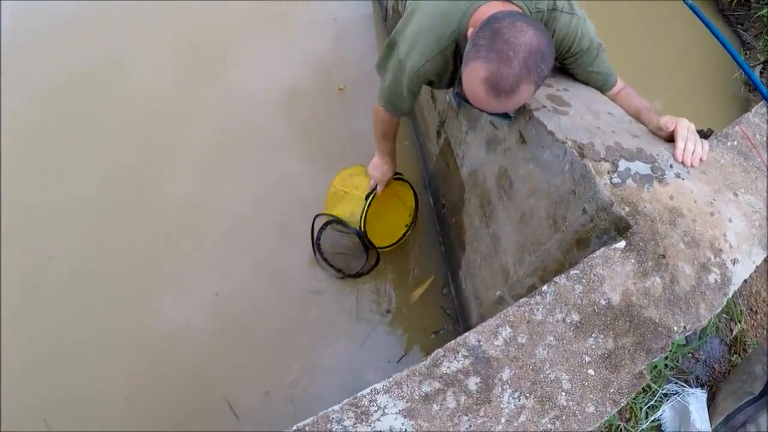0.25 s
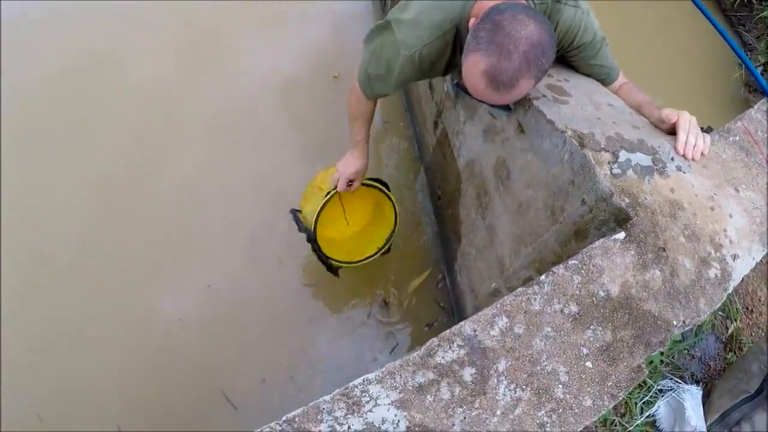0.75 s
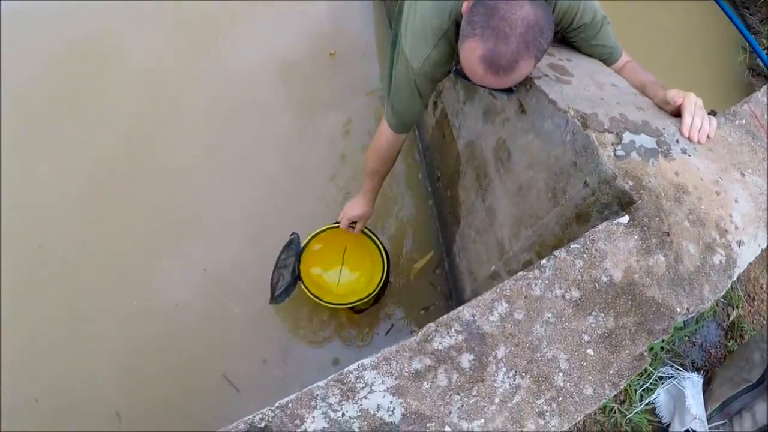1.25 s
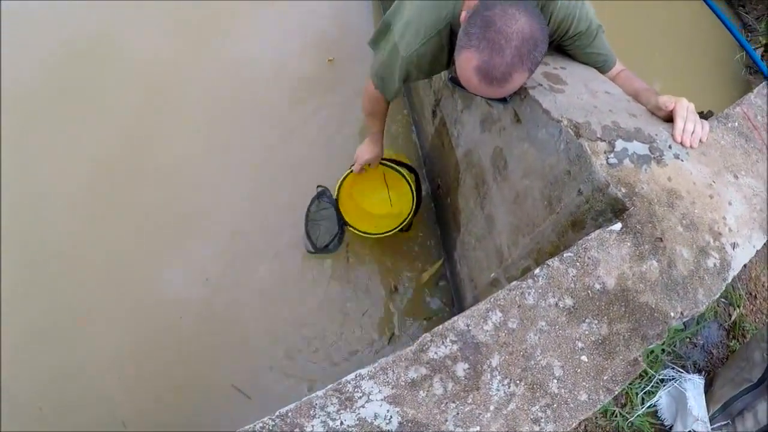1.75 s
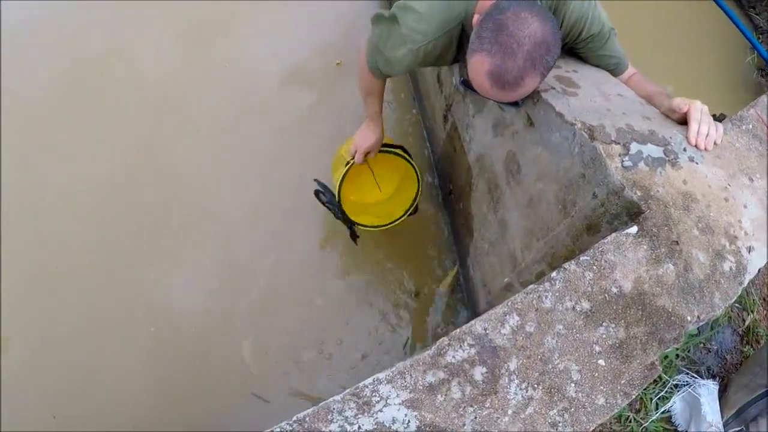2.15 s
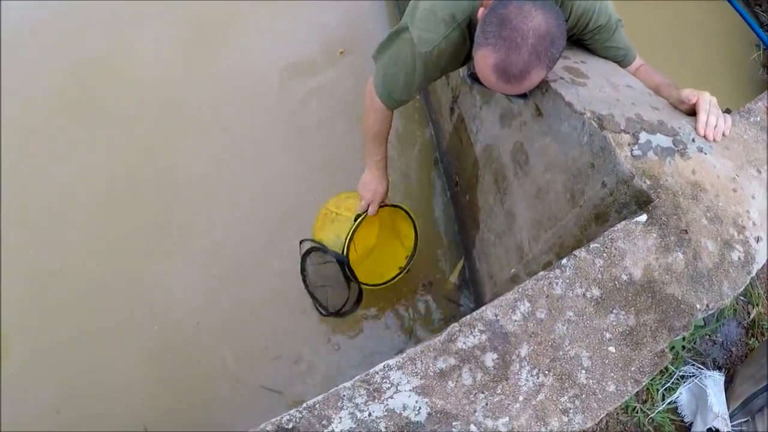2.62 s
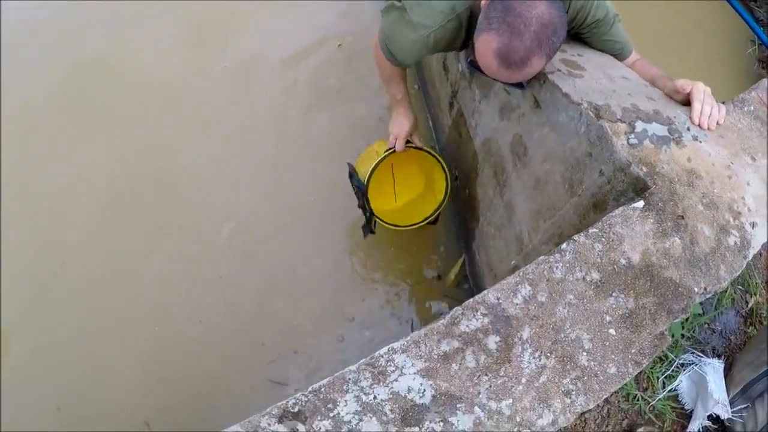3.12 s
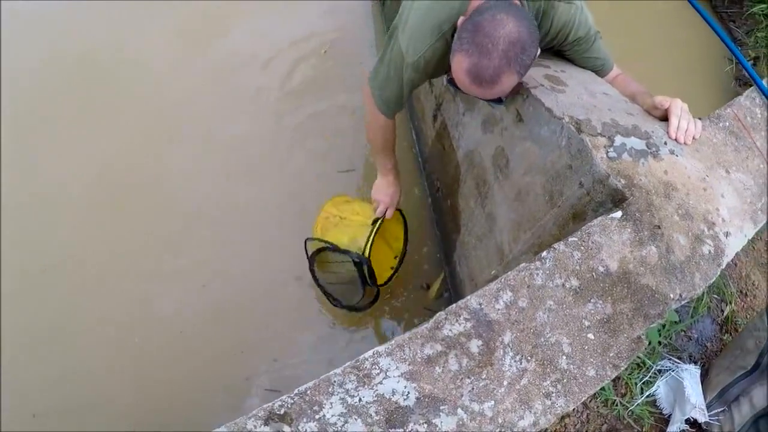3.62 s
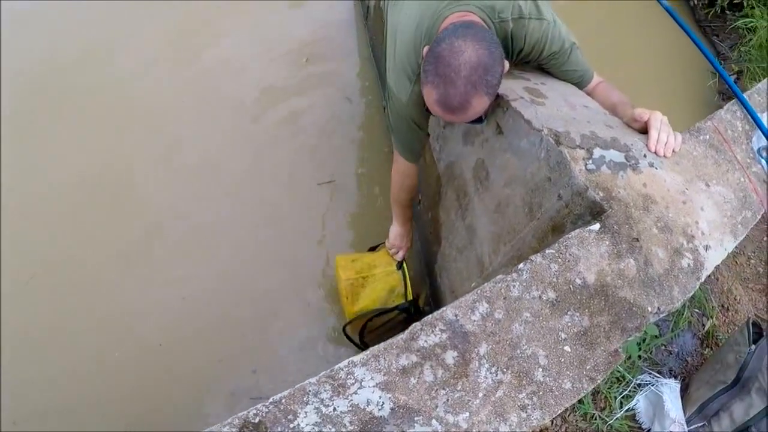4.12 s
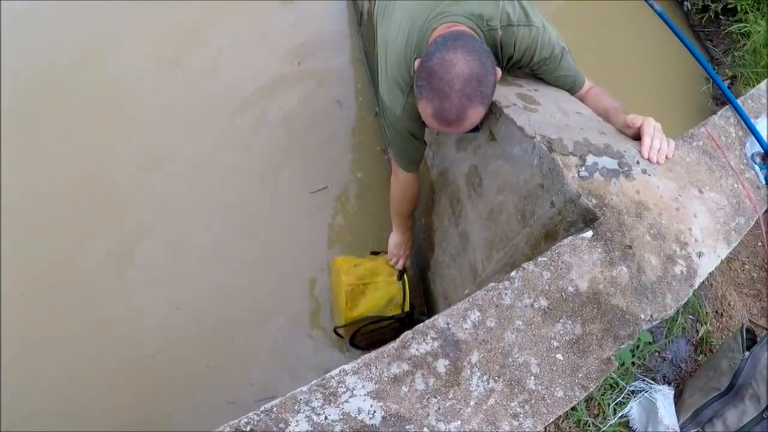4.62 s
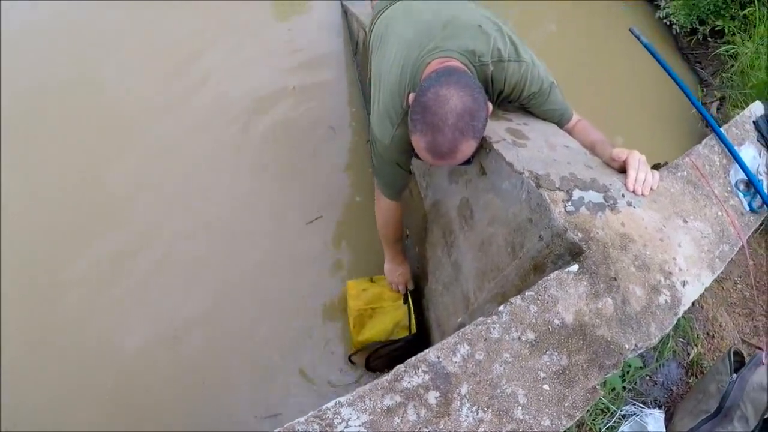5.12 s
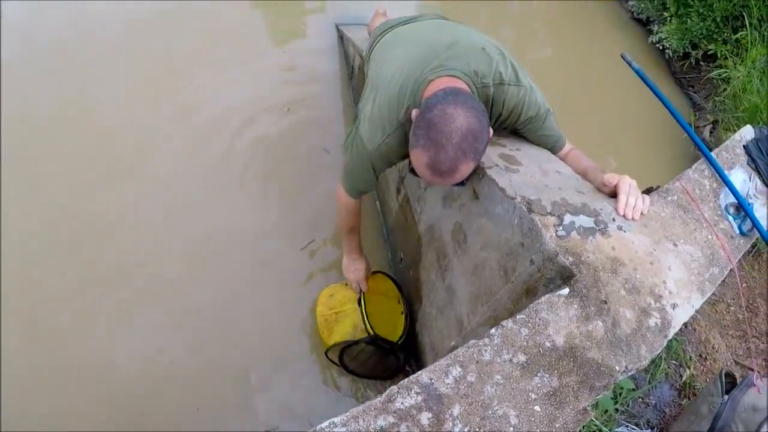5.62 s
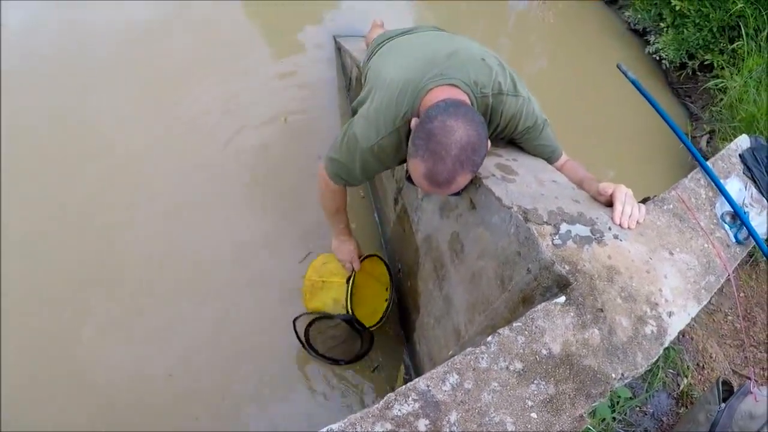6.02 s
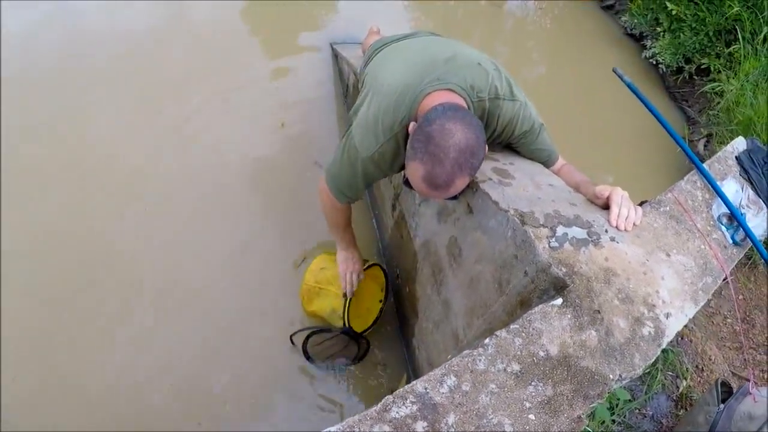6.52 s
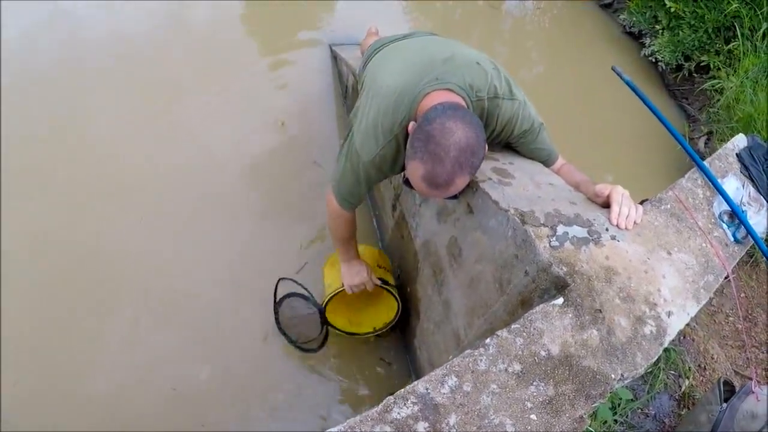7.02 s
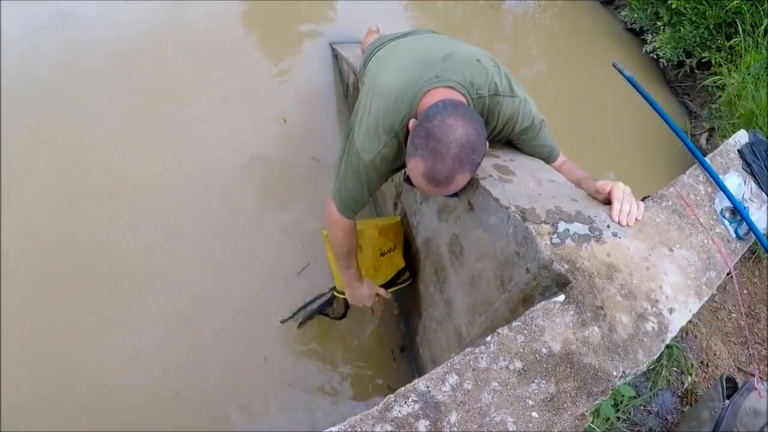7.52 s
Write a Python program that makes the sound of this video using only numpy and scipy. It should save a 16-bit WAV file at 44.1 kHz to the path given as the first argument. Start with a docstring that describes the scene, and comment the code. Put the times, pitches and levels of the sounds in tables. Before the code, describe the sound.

Outdoors beside a concrete wall, a distant idling engine hums low and steady with a slight flutter, under soft air noise. From 0.4 s a soft bucket sends small trickles into the river; at 0.75 s a bright plop, splash and dull knock coincide. Spurts of dripping, plinks and crackling splashes continue to about 2.3 s, with a low throb on the left near 1.8 s. It then calms, with only faint swirls and droplets, until plops, splashes and a knock around 4.2-4.5 s. A stronger hollow knock lands at 5.0 s, another at 5.3 s with gurgles, then scattered drops and a knock at 6.2 s. Short slops begin at 7.3 s and 7.45 s; a fuller gush follows at 7.6 s with a sharp click, ending in plinks. Faint sparrow-like chirps, mostly before 2.5 s, and occasional thin whistles sound far off. Short echoes surround the close water.

```python
"""A soft plastic bucket is swished through river water by a concrete wall, lifted dripping, dipped and tipped.
Noise spray and clouds of decaying, rising sines make the streams; single rising sines plop and slide upward.
Noise bursts splash, struck modes knock hollowly, and shaped noise swirls; a short low throb is heard once.
Behind, gliding sines chirp and close engine lines beat over a noise drone and air noise.
The wall adds short scattered echoes; the recorder spreads the stereo phase and cuts the deep bass and the top."""
import sys
import numpy as np
from scipy import signal
from scipy.fft import rfft, irfft, next_fast_len
from scipy.io import wavfile
from scipy.ndimage import uniform_filter1d, map_coordinates

SR = 44100
rng = np.random.default_rng(int(sys.argv[2]) if len(sys.argv) > 2 else 0)


def persist_wave(psi):
    """Save psi, clipped to +-1, as 16-bit WAV."""
    counts = np.round(np.clip(psi, -1, 1) * 32767).astype(np.int16)
    wavfile.write(sys.argv[1], SR, np.atleast_2d(counts).T)


N = 342216


def amp(db):
    """Decibels to gain."""
    return 10 ** (np.asarray(db) / 20)


def unit(x):
    """Scale to rms 1."""
    return x / np.sqrt(np.mean(x ** 2) + 1e-20)


def along(points, hz):
    """Interpolate (Hz, value) points on a log frequency axis."""
    f, v = np.transpose(points)
    return np.interp(np.log(hz + 1), np.log(f + 1), v)


def wobble(knots_per_s, size=N):
    """Smooth random curve."""
    knots = rng.standard_normal(int(size * knots_per_s / SR) + 4)
    return map_coordinates(knots, [np.arange(size) * knots_per_s / SR])


def filtered(x, response):
    """Multiply the spectrum of x by a response of frequency."""
    n = x.shape[-1]
    padded = next_fast_len(n + SR // 4)
    hz = np.fft.rfftfreq(padded, 1 / SR)
    return irfft(rfft(x, padded) * response(hz), padded)[..., :n]


def shaped(x, points):
    """Filter by a (Hz, dB) curve."""
    return filtered(x, lambda hz: amp(along(points, hz)))


def add(track, start_s, sound):
    """Mix a sound into a track, trimming what falls outside."""
    i = round(start_s * SR)
    part = sound[max(-i, 0):max(N - i, 0)]
    track[max(i, 0):max(i, 0) + len(part)] += part


def event_track():
    """Empty track and the time axis of one short event [s]."""
    return np.zeros(N), np.arange(SR // 6) / SR


def bubble(t, hz, t60_s, rise):
    """An air pocket starts softly and rings, rising in pitch as it nears the surface."""
    onset = 1 - np.exp(-.8 * t * hz)
    phase = 2 * np.pi * hz * t * (1 + rise * t / t60_s / 2)
    return amp(-60 * t / t60_s) * onset * np.sin(phase)


def fizz(count, centre_hz, spread, cycles, size_db):
    """A cloud of random bubbles of rms 1; small ones die sooner."""
    t = np.arange(int(SR * cycles / centre_hz)) / SR
    start, size = rng.random((2, count, 1))
    hz = np.clip(centre_hz * np.exp(spread * rng.standard_normal((count, 1))), 300, 9000)
    gain = amp(size_db * np.minimum(-np.log(size), 3))
    rings = gain * bubble(t, hz, cycles / hz, rise=0.25)
    index = (start * N).astype(int) + np.arange(len(t))
    return unit(np.bincount(index.ravel(), rings.ravel(), N)[:N])


def spatter(rough_db=2.5):
    """The finest droplets: dense, rough noise without ringing."""
    return unit(rng.standard_normal(N) * amp(rough_db * wobble(500)))


def flow(start_s, length_s, rise_s, fall_db_per_s):
    """A flow of water builds up, holds for its length and dies away."""
    t = np.maximum(np.arange(N) / SR - start_s, 0)
    return (1 - np.exp(-t / rise_s)) * amp(-fall_db_per_s * np.maximum(t - length_s, 0))


# streams off the lifted bucket; falling ones spray, water at the surface gurgles:
# start_s, length_s, level_db (before spurts), spray_minus_bubbling_db
RUNOFFS = [(0.357, 0.23, -57.5, 0), (0.625, 0.093, -49, -2), (0.741, 0.17, -48.5, 16),
           (1.018, 0.22, -53, 2.5), (1.264, 0.21, -51.5, 3), (1.55, 0.097, -52.5, 2),
           (1.76, 0.59, -63.5, 3), (4.373, 0.33, -62.5, -18), (5.294, 0.065, -48, -4.5),
           (5.49, 0.065, -56, -13), (5.799, 0.021, -52, 6), (6.215, 0.27, -68, -6), (7.27, 0.36, -57.5, 1)]
# spray spectrum: freq_hz, relative_db
SPRAY_SPECTRUM = [(1200, -13), (2400, -2), (7000, 2)]
RUN_RISE_SHARE, RUN_FALL_DB_PER_S = 0.054, 297.5  # rise as a share of the stream's length
DRIP_DB, DRIP_FALL_DB_PER_S = -11, 24.5  # drips relative to their stream


def running_water(spurt_db=2.0):
    """Streams drive bubbles under and throw up fine spray, in uneven spurts; single drips go along and follow."""
    drops = fizz(count=7500, centre_hz=4396, spread=0.366, cycles=46, size_db=2.5)
    spray = unit(shaped(drops + 0.44 * spatter(), SPRAY_SPECTRUM))
    bubbles = fizz(count=5500, centre_hz=1402, spread=0.435, cycles=21, size_db=2.5)
    drips = fizz(count=650, centre_hz=2510, spread=0.499, cycles=33, size_db=3.5)
    spray_power, bubble_power, drip_power = np.zeros((3, N))
    for start_s, length_s, level_db, fine_db in RUNOFFS:
        rise_s = RUN_RISE_SHARE * length_s
        power = (amp(level_db) * flow(start_s, length_s, rise_s, RUN_FALL_DB_PER_S)) ** 2
        bubbling_share = 1 / (1 + amp(fine_db) ** 2)
        bubble_power += power * bubbling_share
        spray_power += power * (1 - bubbling_share)
        drip_gain = amp(level_db + DRIP_DB)
        drip_power += (drip_gain * flow(start_s, length_s, rise_s, DRIP_FALL_DB_PER_S)) ** 2
    water = np.sqrt(bubble_power) * bubbles + np.sqrt(spray_power) * spray
    spurts = amp(spurt_db * wobble(45) - 2.5)
    return spurts * water + np.sqrt(drip_power) * drips


# sheets slopping over the rim of the tipped bucket: start_s, length_s, level_db
GUSHES = [(7.3, 0.017, -45.5), (7.442, 0.017, -43), (7.599, .17, -42.5)]
# turbulence spectrum: freq_hz, relative_db
GUSH_SPECTRUM = [(230, 3.5), (480, -5.5), (780, 3.5), (1250, -9.5), (3700, -8.5), (6000, -8.5),
                 (8500, -19.5)]
GUSH_RISE_S, GUSH_FALL_DB_PER_S = 0.0016, 460


def pour(lumps_db=2.0):
    """Sheets of water rush over the rim: lumpy turbulence, hollow from the bucket and full of froth."""
    froth = fizz(count=6000, centre_hz=2290, spread=0.497, cycles=22, size_db=2.5)
    turbulence = unit(shaped(rng.standard_normal(N), GUSH_SPECTRUM))
    sheets = np.zeros(N)
    for start_s, length_s, level_db in GUSHES:
        sheets += amp(level_db) * flow(start_s, length_s, GUSH_RISE_S, GUSH_FALL_DB_PER_S)
    return sheets * amp(lumps_db * wobble(90)) * unit(turbulence + 0.61 * froth)


BUBBLE_T60_AT_1K_S = 0.032


def plop(t, hz):
    """One bubble; the larger, the longer it rings."""
    return bubble(t, hz, BUBBLE_T60_AT_1K_S * (hz / 1000) ** -.55, rise=.14)


def crackle(t, centre_hz, t60_s, attack_share=0.062):
    """A short fading burst of droplets round a centre pitch."""
    droplets = rng.standard_normal(len(t)) * amp(4.4 * wobble(900, size=len(t)))
    burst = unit(filtered(droplets, lambda hz: 1 / (1 + 0.72 * (hz / centre_hz - centre_hz / (hz + 1)) ** 2)))
    return amp(-60 * t / t60_s) * (1 - np.exp(-t / (attack_share * t60_s))) * burst


# air pockets, large ones plop, small ones plink: start_s, pitch_hz (at the start), level_db
BUBBLES = [(.433, 2950, -40), (.555, 4800, -38.5), (.576, 3030, -36.5), (.678, 1460, -39.5),
           (.753, 1130, -29.5), (.828, 1360, -36.5), (.844, 4260, -35.5), (1.185, 2430, -35),
           (1.223, 1510, -36.5), (1.238, 465, -39.5), (1.276, 2410, -39), (1.365, 920, -37),
           (1.568, 3650, -42), (1.622, 3820, -35.5), (1.73, 4470, -32), (1.74, 3550, -43),
           (1.781, 4870, -39), (1.884, 1380, -47), (2.122, 747, -33), (2.158, 1420, -39.5),
           (4.192, 480, -36.5), (4.412, 4110, -44), (4.467, 1340, -34), (4.479, 1720, -32.5),
           (4.653, 1320, -37.5), (5.336, 1017, -33), (5.349, 877, -34.5), (5.52, 2460, -37.5),
           (5.534, 1970, -38.5), (5.804, 960, -44.5), (6.201, 4500, -44.5), (6.244, 1680, -41.5),
           (6.315, 3030, -43), (6.4, 4120, -41), (6.4, 1205, -42), (7.303, 824, -35), (7.309, 3570, -36.5),
           (7.313, 590, -32.5), (7.475, 835, -35), (7.567, 2900, -37), (7.721, 3880, -31),
           (7.732, 3570, -32)]
SMACK_T60_S, SMACK_DB = 0.026, -9.5  # level relative to the ring


def plops():
    """Air pockets close with a wet smack and ring."""
    out, t = event_track()
    for start_s, pitch_hz, level_db in BUBBLES:
        smack = amp(SMACK_DB) * crackle(t, pitch_hz, SMACK_T60_S)
        add(out, start_s, amp(level_db) * (plop(t, pitch_hz) + smack))
    return out


# bubbles singing up to the surface: start_s, start_pitch_hz, level_db, length_s, rise_share of the pitch
BLOOPS = [(1.583, 1150, -40.5, 0.041, 0.54), (5.934, 1220, -46, 0.025, 0.74)]


def bloops():
    """A bubble just under the surface rings on and slides upward ever faster until it bursts."""
    out = np.zeros(N)
    for start_s, pitch_hz, level_db, length_s, rise_share in BLOOPS:
        u = np.linspace(0, 1, int(length_s * SR))
        phase = 2 * np.pi * np.cumsum(pitch_hz * (1 + rise_share * u ** 2)) / SR
        envelope = (1 - np.exp(-10 * u)) * np.sqrt(1 - u) * np.exp(-u)
        add(out, start_s, amp(level_db) * envelope * np.sin(phase))
    return out


# drops and slaps hitting the river: start_s, level_db, centre_hz, t60_s
SPLASHES = [(0.667, -32, 4380, 0.033), (.752, -28, 2380, 0.024), (0.827, -38, 4600, 0.018),
            (1.096, -37, 2720, 0.013), (1.326, -35, 3660, 0.032), (1.368, -33.5, 3600, 0.024),
            (1.407, -26.5, 4300, 0.012), (2.136, -40, 5530, 0.03), (2.327, -39.5, 3000, 0.027),
            (2.675, -43.5, 6260, 0.023), (3.15, -46, 3480, 0.025), (4.165, -37, 3870, 0.036),
            (4.409, -40.5, 2860, 0.034), (5.854, -36.5, 4270, 0.024), (5.932, -38, 4200, 0.0094),
            (5.961, -45, 5040, .015), (7.264, -35.5, 3970, .026), (7.5, -33.5, 1750, .028),
            (7.538, -37.5, 3400, 0.016)]
PING_DB = -13  # trapped bubble relative to the crackle


def splashes():
    """Each slap of water crackles and traps a small bubble."""
    out, t = event_track()
    for start_s, level_db, centre_hz, t60_s in SPLASHES:
        ping = amp(PING_DB) * plop(t, centre_hz)
        add(out, start_s, amp(level_db) * (crackle(t, centre_hz, t60_s) + ping))
    return out


def ring(t, modes, pitch_factor):
    """Struck modes dying away; neighbours swing in opposite directions."""
    out = np.zeros(len(t))
    for k, (mode_hz, level_db, t60_s) in enumerate(modes):
        out += (-1) ** k * amp(level_db - 60 * t / t60_s) * np.sin(2 * np.pi * mode_hz * pitch_factor * t)
    return out


# hollow knocks: start_s, level_db, pitch_factor (as the bucket fills and empties)
KNOCKS = [(.753, -31, 0.864), (2.329, -44, 1.5), (4.168, -39.5, 1.46), (5.013, -24, 1.045),
          (5.268, -34.5, 1.12), (6.211, -29.5, 1.12), (7.449, -36, 1.35), (7.499, -39, 1.1),
          (7.615, -30.5, 1.55)]
# bucket wall modes: mode_hz (at pitch factor 1), relative_db, t60_s
BUCKET_MODES = [(238, -0.5, 0.043), (433, 0, 0.023), (587, -8, 0.041), (700, -4, 0.015), (913, -11, 0.036),
                (1340, -12.5, 0.015)]
# hard part: mode_hz, relative_db, t60_s
HANDLE_MODES = [(3430, 1, 0.0048)]


def bucket(click_s=7.6143, click_db=-10):
    """The soft wall knocks dully; a hard part, likely the handle, clicks once as the bucket tips."""
    out, t = event_track()
    for start_s, level_db, pitch_factor in KNOCKS:
        add(out, start_s, amp(level_db) * (1 - np.exp(-t / 0.0014)) * ring(t, BUCKET_MODES, pitch_factor))
    add(out, click_s, amp(click_db) * (1 - np.exp(-t / 0.00024)) * ring(t, HANDLE_MODES, 1))
    return out


# stereo width: freq_hz, side_minus_mid_db
WIDTH = [(180, -4), (320, 1), (570, 7.5), (1000, 8.5), (1750, 2), (3000, -11.5), (5400, -4)]


def rush(spectrum, patchy_db=2.0):
    """Diffuse stereo noise whose middle has rms 1, with drifting patches of gain."""
    z = signal.stft(rng.standard_normal((2, N)), nperseg=512)[2]
    patches = uniform_filter1d(rng.standard_normal(z.shape[1:]), size=4, axis=0)  # across frequency
    patches = uniform_filter1d(patches, size=10, axis=1)  # across time
    noise = signal.istft(z * amp(patchy_db * unit(patches)), nperseg=512)[1][:, :N]
    mid, side = unit(shaped(noise, spectrum))
    side = shaped(side, WIDTH)
    return np.array([mid + side, mid - side])


# strokes through the river: fastest_s, level_db, fade_s (swirl falls to about a third)
STROKES = [(.42, -52, 0.19), (1.83, -54.5, 0.11), (3.35, -58.5, 0.27), (4.62, -63, 0.22),
           (5.37, -54.5, 0.17)]
# eddy spectrum: freq_hz, relative_db
EDDY_SPECTRUM = [(150, -21), (260, 4), (400, 0), (600, -8), (2500, -26)]
LAPPING_DB = -65.5  # river against the wall between strokes


def swirl():
    """Eddies round the bucket wall swell and fade with each stroke."""
    t = np.arange(N) / SR
    power = amp(LAPPING_DB) ** 2
    for fastest_s, level_db, fade_s in STROKES:
        power = power + (amp(level_db) * np.exp(-((t - fastest_s) / fade_s) ** 2)) ** 2
    return np.sqrt(power) * amp(2.1 * wobble(25)) * rush(EDDY_SPECTRUM)


def throb(start_s=1.825, gap_s=0.053, hz=173, first_db=-17, later_db=-23, t60_s=0.081, right_db=-15, count=4):
    """A short low throb, mostly on the left: one strong decaying pulse and a few weaker ones."""
    out, t = event_track()
    for k in range(count):
        add(out, start_s + k * gap_s, amp(later_db if k else first_db) * bubble(t, hz, t60_s, rise=0))
    return np.array([out, amp(right_db) * out])


def echo(x, decay):
    """Scattered reflections, different in each channel; decay holds (Hz, t60 s)."""
    hz, t, z = signal.stft(rng.standard_normal((2, SR // 2)), SR, nperseg=256)
    fade = amp(-60 * t / along(decay, hz)[:, None])
    tail = signal.istft(z * fade, SR, nperseg=256)[1]
    return signal.fftconvolve(x[None], tail / np.linalg.norm(tail[0]), axes=1)[:, :N]


def left_leads(x, radians):
    """Turn the phase between the two channels by an angle that depends on frequency."""
    return filtered(x, lambda hz: np.exp(1j * np.array([[1], [-1]]) * radians(hz) / 2))


CHIRP_S, CHIRP_BEND_S = 0.087, 0.022  # length; time constant of the glide
CHIRP_FALL_AT_5K = 0.45  # glide depth over an end pitch of 5 kHz


def note(end_hz, fall, length_s, rasp):
    """A bird's note drops steeply and levels off on its end pitch, with a fast flutter."""
    t = np.arange(int(length_s * SR)) / SR
    hz = end_hz * (1 + fall * np.exp(-t / CHIRP_BEND_S) + rasp * wobble(950, size=len(t)))
    envelope = np.sqrt(np.sin(np.pi * t / length_s)) * amp(3.0 * wobble(200, size=len(t)))
    return envelope * np.sin(2 * np.pi * np.cumsum(hz) / SR)


# sparrow-like falling chirps: start_s, end_pitch_hz, relative_db
CHIRPS = [(-.06, 5050, -48.5), (0.227, 4720, -56.5), (.398, 5190, -51), (1.045, 4960, -54.5),
          (1.512, 5200, -50.5), (1.772, 5040, -54), (2.045, 4520, -52.5), (2.22, 4430, -57.5),
          (2.395, 5060, -56), (3.65, 5000, -61), (5.024, 5050, -57), (5.43, 4680, -58.5),
          (7.055, 4790, -57)]
# thin whistles: start_s, end_pitch_hz, relative_db
WHISTLES = [(3.37, 8470, -56.5), (4.845, 8500, -57), (6.76, 8450, -56), (6.95, 4440, -58)]


def birds():
    """Falling chirps, the higher the deeper their fall, and thin whistles with a slight fall."""
    out = np.zeros(N)
    for start_s, end_hz, level_db in CHIRPS:
        fall = CHIRP_FALL_AT_5K * (end_hz / 5000) ** 3
        add(out, start_s, amp(level_db) * note(end_hz, fall, CHIRP_S, rasp=.05))
    for start_s, end_hz, level_db in WHISTLES:
        add(out, start_s, amp(level_db) * note(end_hz, fall=0.045, length_s=0.12, rasp=0.011))
    return out


# engine lines: cycle_rate_multiple, relative_db
ENGINE_LINES = [(22, -1.5), (23, -8), (24, -3.5), (25, -1), (26, -15), (28, -16.5), (29, -15.5)]
# drone spectrum: freq_hz, relative_db
DRONE_SPECTRUM = [(25, -15.5), (135, -4), (170, 0.5), (200, -3.5), (340, -13.5), (600, -31.5)]
# stereo phase of the engine, as the recorder spreads it: freq_hz, left_lag_rad
ENGINE_LAG = [(130, 0.4), (170, 0.62), (260, 1.21), (500, 3.02)]


def engine(cycle_hz=6.628, lines_db=-50.5, drone_db=-51.0, diffuse_db=-54.5):
    """A far engine at idle: close lines of its firing cycle beat against each other over a rough drone."""
    turns = np.cumsum(cycle_hz * (1 + 0.0019 * wobble(1.44))) / SR
    lines = np.zeros(N)
    for multiple, level_db in ENGINE_LINES:
        k = round(multiple)
        # k * k / 6 sets three firings a cycle, smeared by the distance into a soft flutter
        line = np.sin(2 * np.pi * (k * turns + k * k / 6))
        lines += amp(level_db + 3.8 * wobble(3.147)) * line
    drone = unit(shaped(rng.standard_normal(N), DRONE_SPECTRUM))
    mono = amp(lines_db) * unit(lines) + amp(drone_db) * drone
    spread = left_leads(mono, lambda hz: -along(ENGINE_LAG, hz))
    return spread + amp(diffuse_db) * rush(DRONE_SPECTRUM)


# air noise spectrum: freq_hz, relative_db
AIR_SPECTRUM = [(200, -2.5), (300, -9), (430, -7.5), (1400, -12.5), (3000, -16.5), (4500, -21.5),
                (6300, -19), (9000, -17.5)]


def air_noise(level_db=-58.0):
    """Steady diffuse noise of the open air."""
    return amp(level_db) * rush(AIR_SPECTRUM)


# concrete wall reflections: freq_hz, t60_s
WALL_DECAY = [(200, 0.089), (1500, 0.089), (8000, 0.17)]
# stereo balance: freq_hz, left_minus_right_db
LEAN = [(150, 4.5), (350, 2.5), (1000, -2), (6000, -1)]
WATER_LAG_RAD = 0.55  # left phase lag of the near water at 600 Hz


def scene():
    """Near water in front of the wall, far birds and engine all round."""
    near = running_water() + pour() + plops() + bloops() + splashes() + bucket()
    # the recorder's stereo processing turns the phase of the left channel later around 600 Hz
    direct = left_leads(near, lambda hz: -WATER_LAG_RAD * np.exp(-np.log((hz + 1) / 600) ** 2))
    water = direct + amp(-4.0) * echo(near, WALL_DECAY) + swirl()
    song = birds()
    far_song = 0.59 * song + 1.04 * echo(song, [(5000, 0.52)])
    mix = water + throb() + far_song + engine() + air_noise()
    return filtered(mix, lambda hz: amp(np.array([[1], [-1]]) * along(LEAN, hz) / 2))


# recorder response: freq_hz, gain_db
MICROPHONE = [(112, -17), (142, 1.5), (7000, 2), (8200, -6.5)]
TOP_HZ = 9130  # band limit


def record(dry):
    """The recorder thins the deep bass, dulls the top and keeps almost nothing above its band limit."""
    coloured = shaped(dry, MICROPHONE)
    return filtered(coloured, lambda hz: 1 / (1 + (hz / TOP_HZ) ** 130))


dry = scene()
out = record(dry)
persist_wave(out)
```